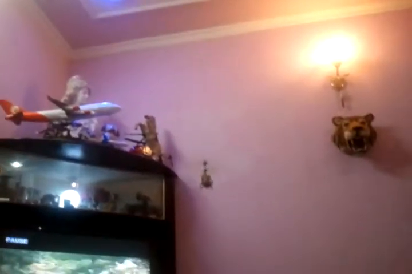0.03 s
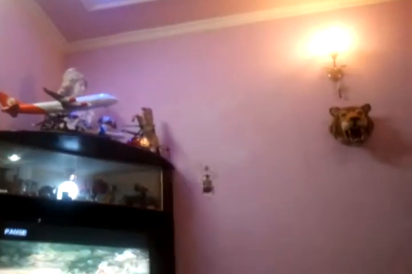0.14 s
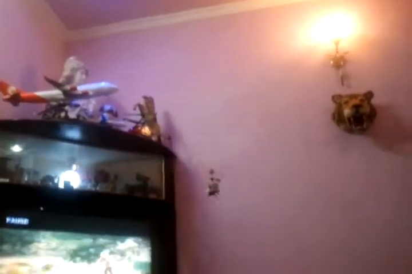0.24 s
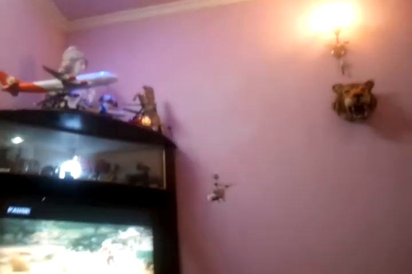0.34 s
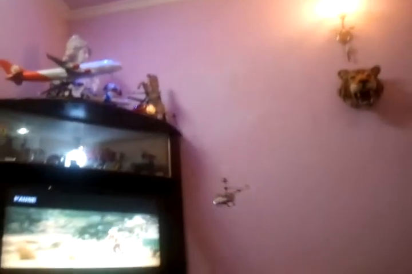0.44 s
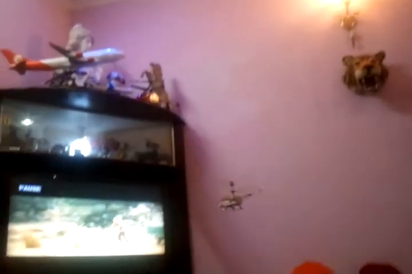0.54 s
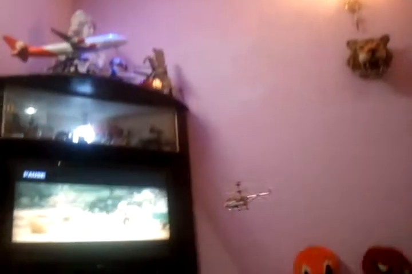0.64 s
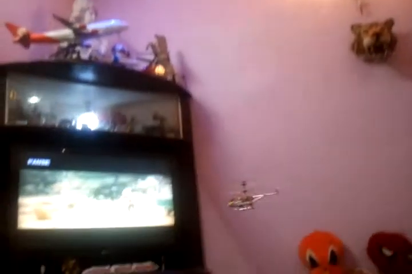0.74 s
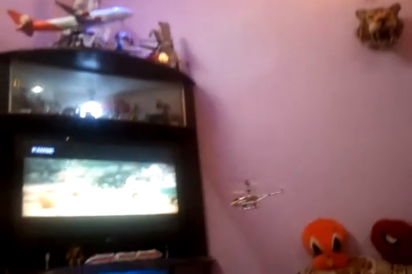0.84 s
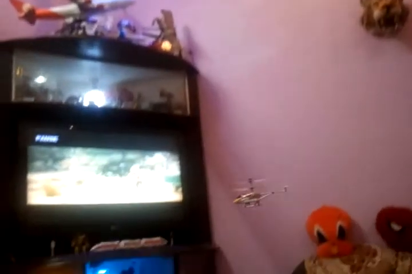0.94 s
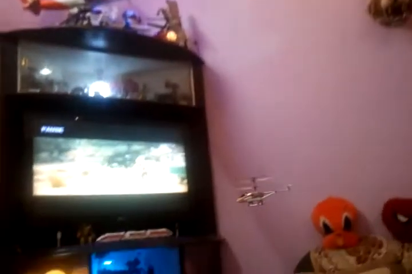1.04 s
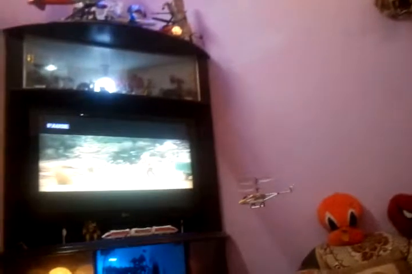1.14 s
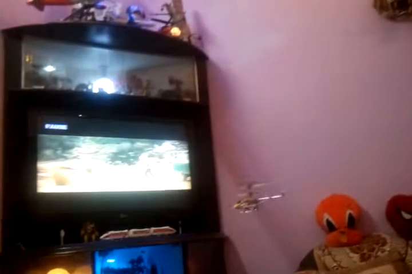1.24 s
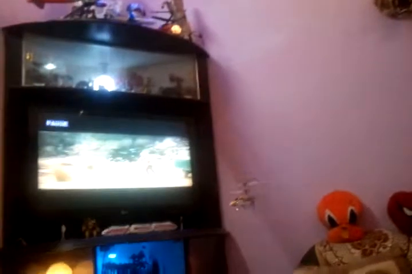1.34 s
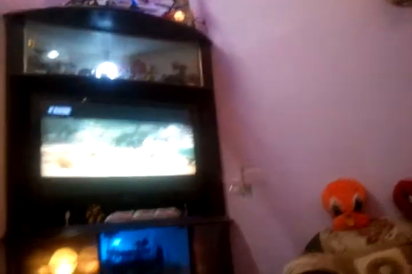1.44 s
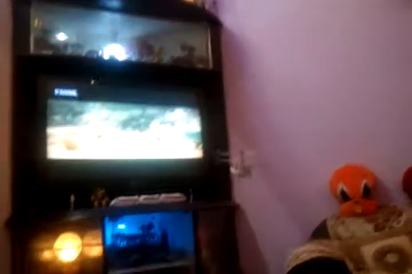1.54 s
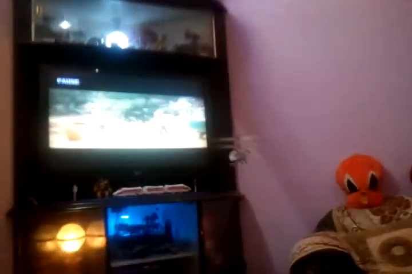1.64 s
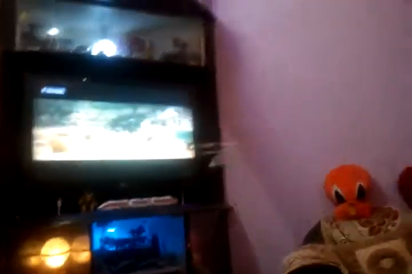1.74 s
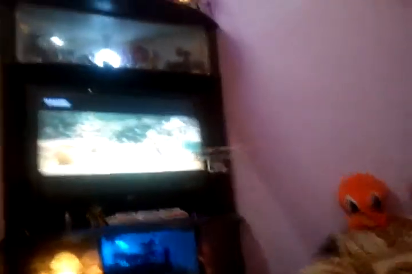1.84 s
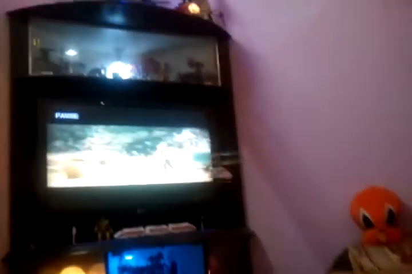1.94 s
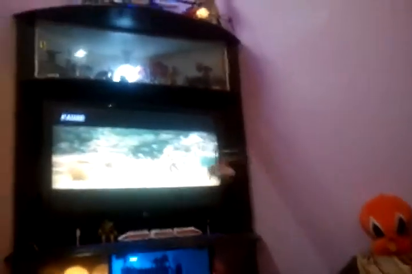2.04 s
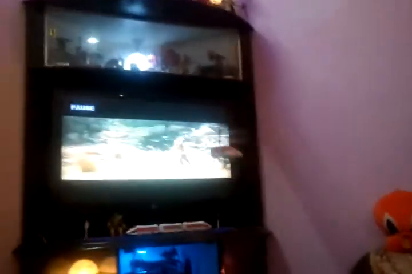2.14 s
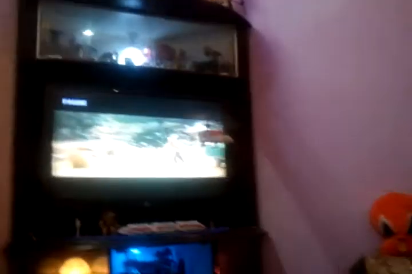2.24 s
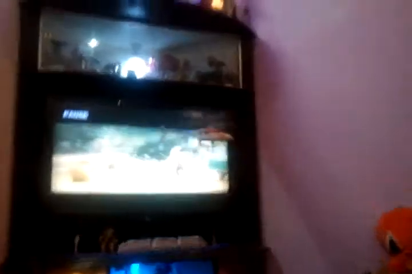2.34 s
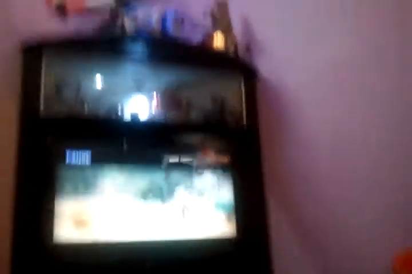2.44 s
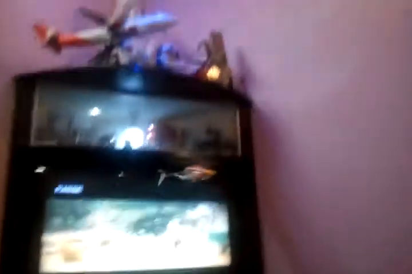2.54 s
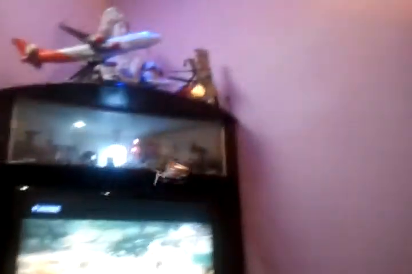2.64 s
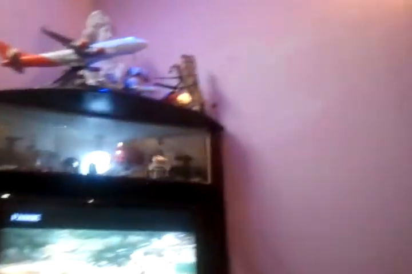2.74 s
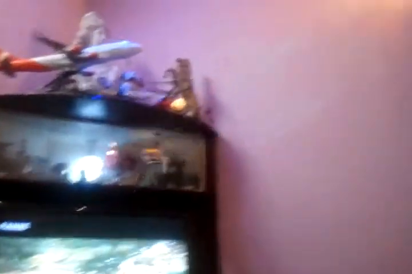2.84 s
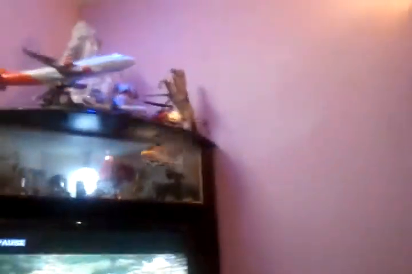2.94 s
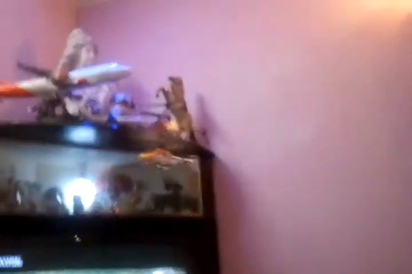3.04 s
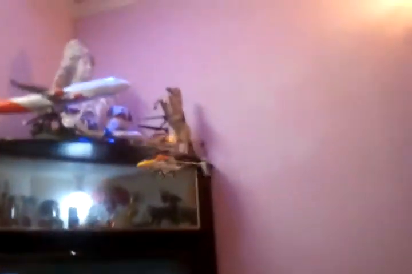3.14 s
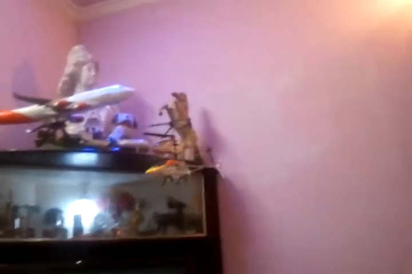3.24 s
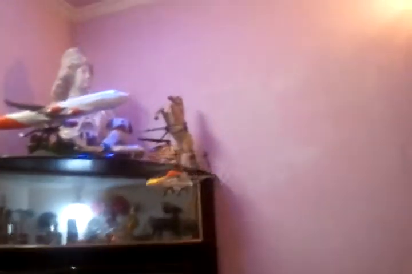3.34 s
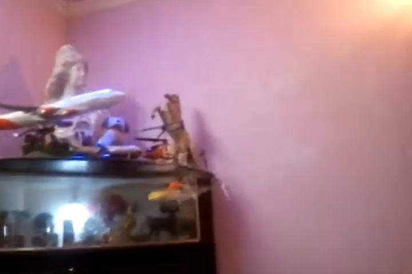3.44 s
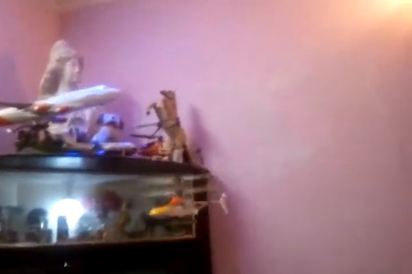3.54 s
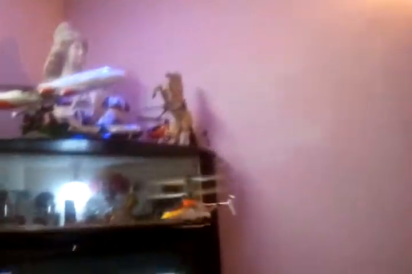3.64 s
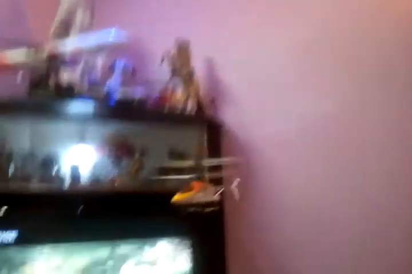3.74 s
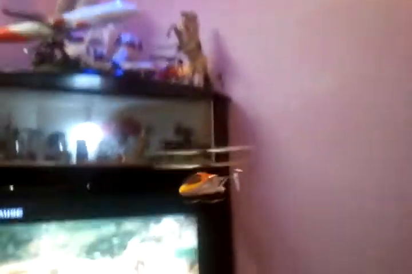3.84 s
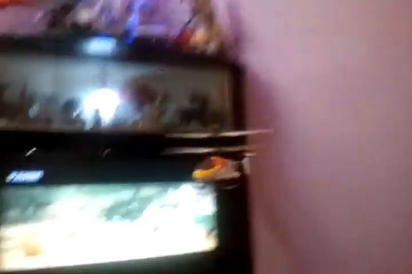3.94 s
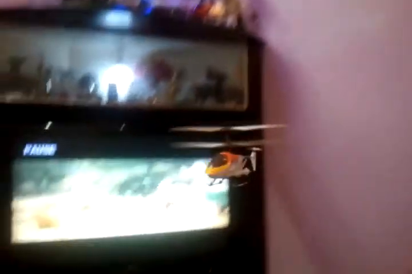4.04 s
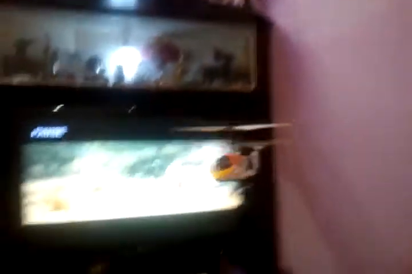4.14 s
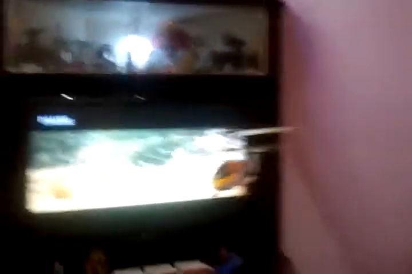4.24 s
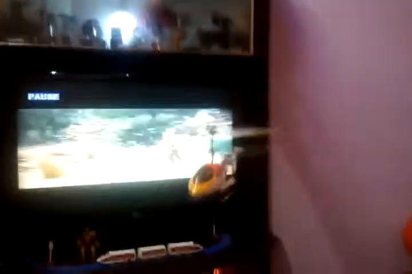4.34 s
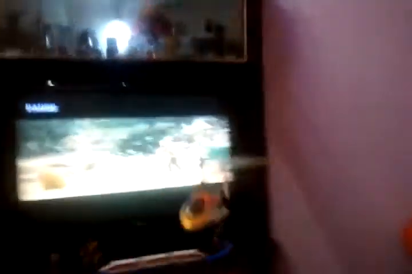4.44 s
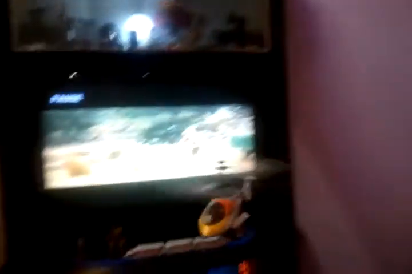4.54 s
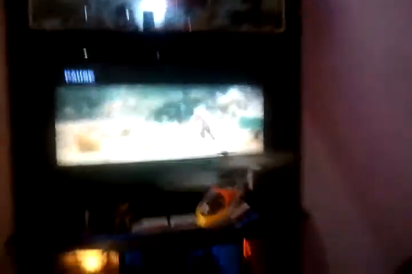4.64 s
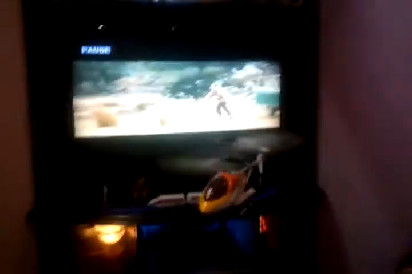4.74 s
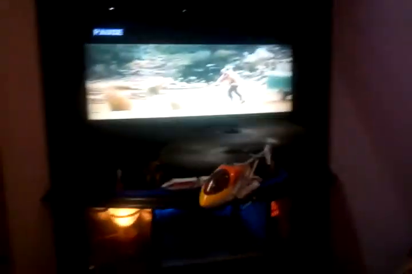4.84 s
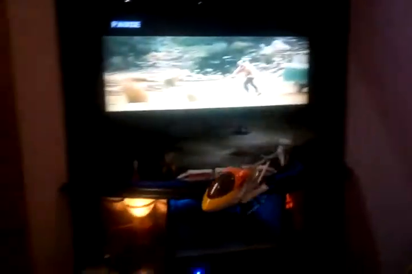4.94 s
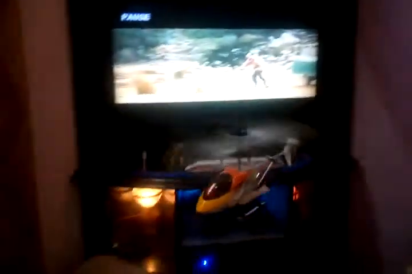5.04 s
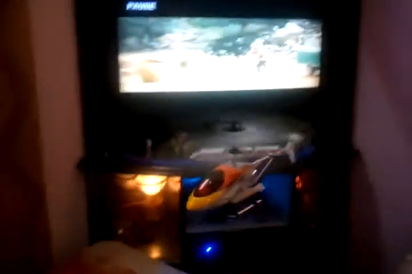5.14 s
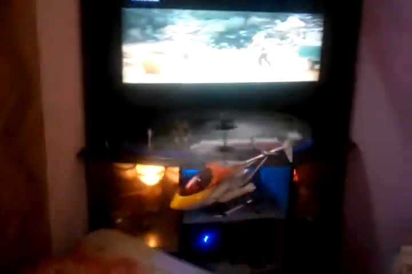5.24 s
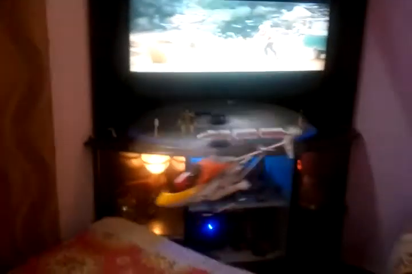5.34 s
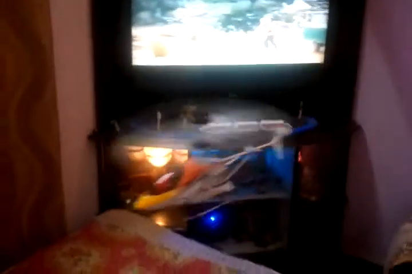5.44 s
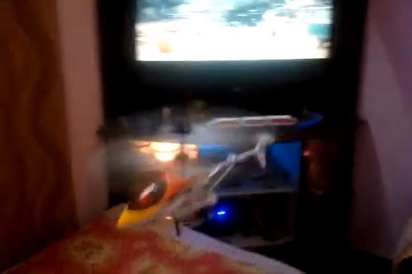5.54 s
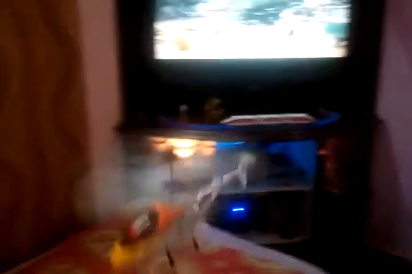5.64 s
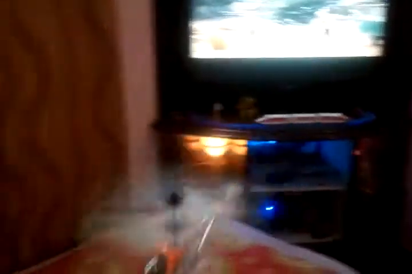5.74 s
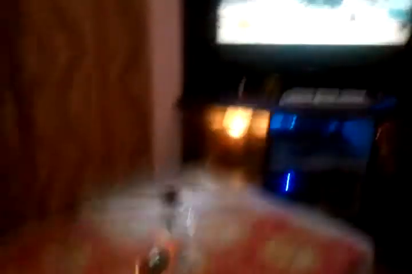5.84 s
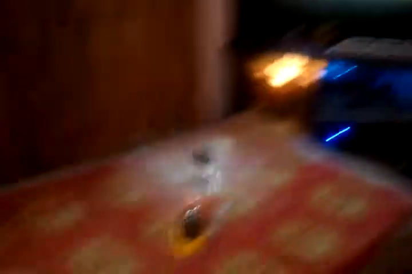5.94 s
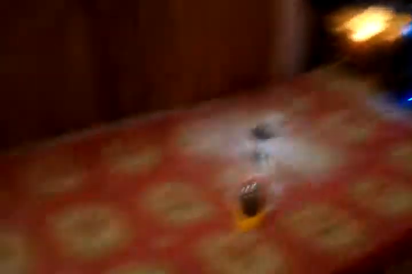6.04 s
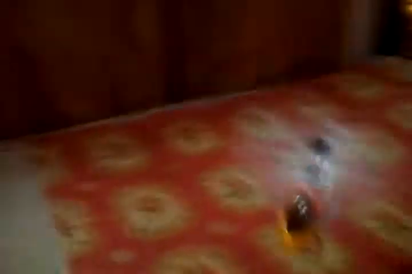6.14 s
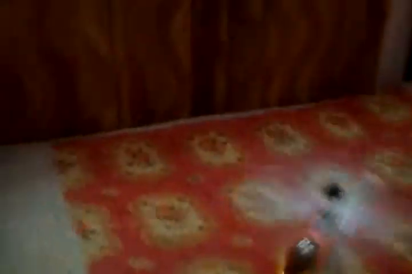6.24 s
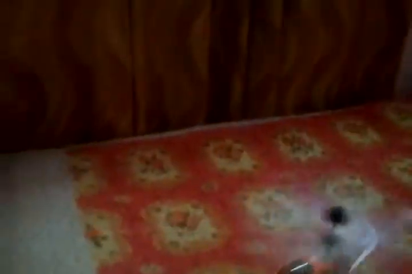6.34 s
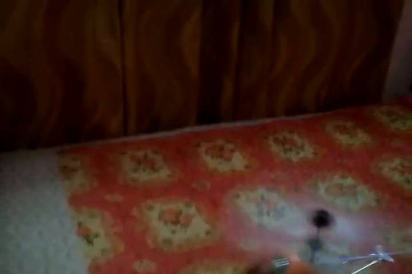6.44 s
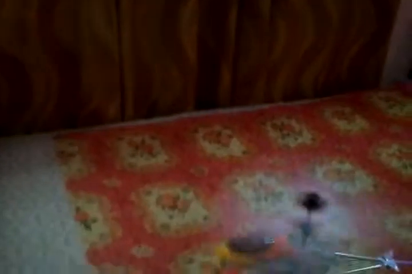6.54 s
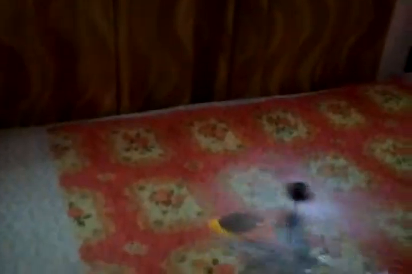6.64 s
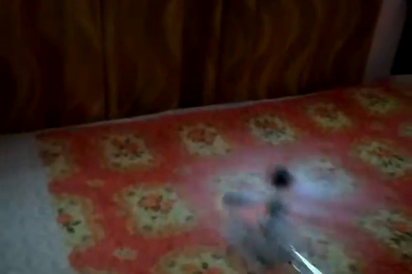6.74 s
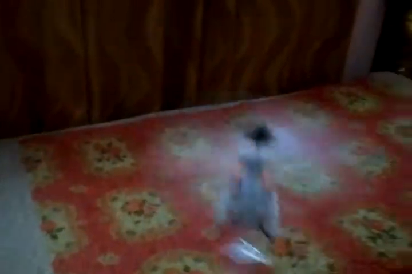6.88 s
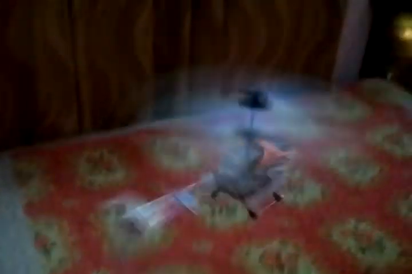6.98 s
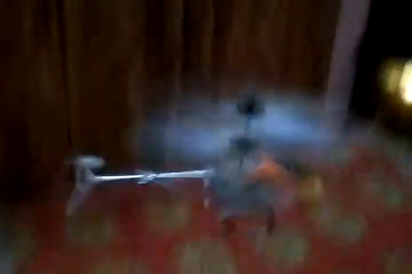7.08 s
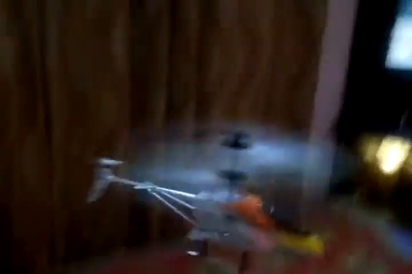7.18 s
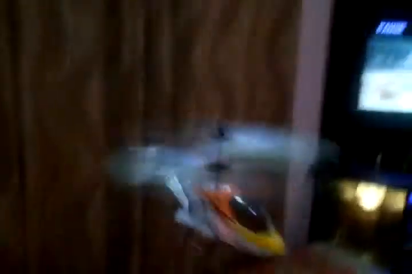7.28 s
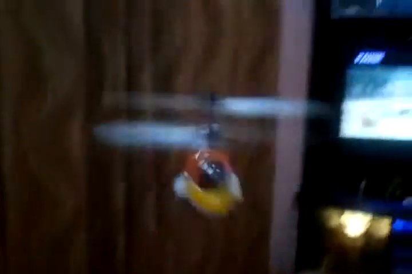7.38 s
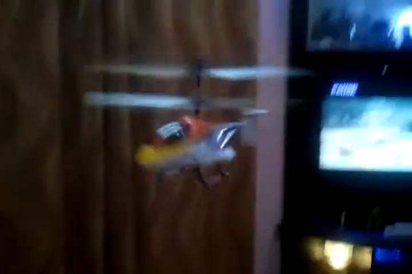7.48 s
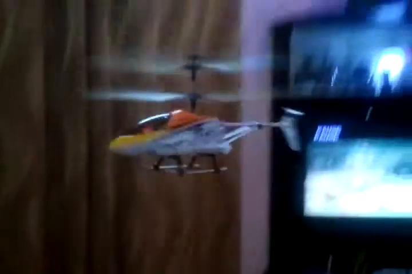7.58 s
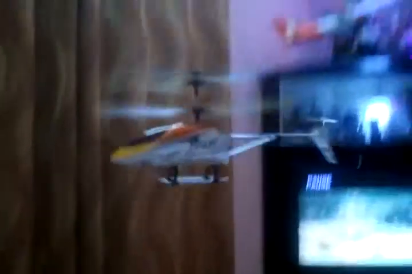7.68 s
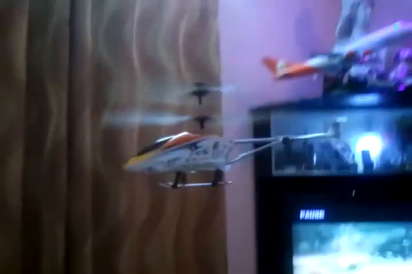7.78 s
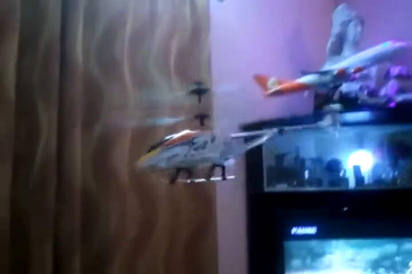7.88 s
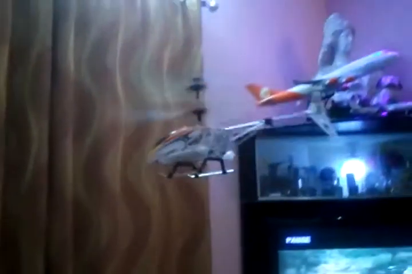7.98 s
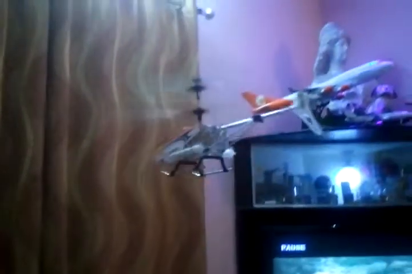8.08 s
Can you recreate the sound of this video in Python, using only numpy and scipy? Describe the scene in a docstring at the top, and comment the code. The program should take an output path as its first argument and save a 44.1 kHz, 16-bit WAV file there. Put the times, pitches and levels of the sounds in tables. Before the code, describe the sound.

In a furnished living room, a small toy helicopter flies with a continuous shrill whine from two geared motors whose pitches drift apart and together. Rotor air rushes and gears hiss. The pitch dips midway, a few soft knocks follow, then it dips again and surges louder near the handheld microphone, ending with a low lumpy rustle.

```python
"""Toy helicopter in a living room

A toy helicopter with two counter-turning rotors flies about, nearer and farther. Each rotor has its own
geared motor, so two combs of shaft orders glide apart and together, with gear hiss and clatter.
The blades sound tones where they cross and push a rush of air. Under it lie three faint steady low tones;
later come a few soft knocks and a lumpy low rustle. Sampling at 16 kHz leaves a weak mirrored treble.
"""
import sys
import numpy as np
from scipy import signal
from scipy.fft import rfft, irfft, next_fast_len
from scipy.io import wavfile
from scipy.ndimage import uniform_filter1d, map_coordinates

SR = 44100
rng = np.random.default_rng(int(sys.argv[2]) if len(sys.argv) > 2 else 0)


def dump(signal):
    """Clip the signal to [-1, 1] and save it as 16-bit WAV at the path in sys.argv[1]."""
    limited = np.clip(np.atleast_2d(signal).T, -1, 1)
    pcm = np.round(limited * 32767).astype(np.int16)
    wavfile.write(sys.argv[1], SR, pcm)


N = 357651

# Speed of the two motors: t/s, fast motor/(turns/s), slow motor/(turns/s)
MOTOR_SPEEDS = [(0, 256.5, 234.6), (0.37, 257.3, 234), (0.67, 262.1, 241.8), (0.85, 270.1, 252.3),
                (0.94, 272.2, 256.1), (1.16, 274.2, 259.9), (1.64, 274.8, 262.5), (2.02, 275, 263.9),
                (2.31, 277.8, 261.4), (2.56, 274.2, 264.9), (2.9, 274.1, 265.7), (3.0, 268.6, 258.9),
                (3.14, 262.9, 253), (3.42, 236.3, 219.7), (3.47, 233.8, 213.2), (3.52, 236.9, 210.4),
                (3.7, 249.1, 219.1), (3.84, 259.4, 229.3), (4.09, 264.3, 244.2), (4.21, 266, 248.6),
                (4.4, 266.7, 253.3), (4.92, 268.1, 253.5), (5.25, 268.2, 252.1), (5.495, 266.2, 248.5),
                (5.61, 250.8, 231.4), (5.78, 241.5, 213.7), (5.95, 248.5, 216.2), (6.08, 265.6, 238.6),
                (6.25, 274.9, 262.3), (6.39, 276.8, 271.1), (6.5, 277.3, 274.5), (6.62, 276.4, 276.3),
                (7.245, 279.6, 279.8), (7.36, 273.6, 272.4), (7.55, 269.8, 262), (7.69, 257.2, 247.8),
                (7.77, 254.5, 241.9), (7.89, 252.4, 236.8), (8.11, 251.8, 232.4)]
# Blade-crossing tones, strongest when the rotor disc faces the microphone:
# t/s, crossing tone level/dB, its 2nd harmonic level/dB, its 3rd harmonic level/dB
BLADE_THUMP = [(0, -67.5, -50.5, -48.5), (.58, -55, -50.5, -52), (1.0, -56.5, -57, -64),
               (1.9, -59, -55.5, -56), (2.6, -57, -49, -58.5), (3.0, -53.5, -57.5, -53.5),
               (3.44, -70, -59.5, -58), (4.0, -54, -63, -51), (4.5, -53.5, -51.5, -69.5),
               (5.4, -56.5, -57, -62), (5.6, -51, -61, -54), (5.75, -58.5, -61, -74.5),
               (6.12, -46.5, -52, -50.5), (6.56, -41, -36.5, -39), (6.93, -41, -50.5, -58),
               (7.23, -46, -41.5, -43), (7.4, -54.5, -53, -56), (7.52, -53.5, -57, -39.5),
               (7.66, -50, -45, -64), (7.82, -55.5, -54, -41.5), (8.11, -51.5, -53, -55)]
# Nearness: t/s, rotor rush level before trim/dB, gear hiss level before trim/dB, gain on the whines/dB
NEARNESS = [(0, -41.5, -31, -0.5), (.38, -40, -32, -5.5), (.92, -40.5, -27, -1), (1.5, -40.5, -28.5, -3.5),
            (1.94, -40, -30, -3), (2.3, -39.5, -24, -2.5), (2.75, -39, -28.5, -2.5), (3.2, -39.5, -27, -4),
            (3.7, -41, -26, -0.5), (4.3, -37, -31, 3), (4.86, -36, -28.5, 1.5), (5.17, -35.5, -29.5, 4),
            (5.44, -35, -30.5, 2), (5.95, -38, -26, 2), (6.3, -33.5, -37.5, 1.5), (6.62, -34.5, -21, 4.5),
            (6.91, -34.5, -27.5, 2), (7.25, -36, -20, 1.5), (7.57, -34.5, -27.5, 1.5),
            (7.9, -36.5, -18.5, 5.5), (8.11, -37.5, -25, 3.5)]
GEAR_RATIO = 6  # motor turns per rotor turn
CONTROL_STEP = 64  # samples between points of a slow curve


def amp(db):
    """Gain of a level in dB."""
    return 10 ** (np.asarray(db) / 20)


def unit(x):
    """Scale x to rms 1."""
    return x / np.sqrt(np.mean(x ** 2) + 1e-20)


def about_mean(curve):
    """A curve's swing about its own mean."""
    return curve - curve.mean()


def curves(rows):
    """One value per sample for each column after the time."""
    times, *columns = np.transpose(rows)
    return [np.interp(np.arange(N) / SR, times, column) for column in columns]


def wobble(rate_hz):
    """A smooth random curve with rate_hz knots a second."""
    knots = rng.standard_normal(int(N * rate_hz / SR) + 4)
    coarse_at = np.arange(0, N + CONTROL_STEP, CONTROL_STEP)
    coarse = map_coordinates(knots, [coarse_at * rate_hz / SR])
    return np.interp(np.arange(N), coarse_at, coarse)


def coloured(points, hz):
    """Gain at hz from (f/Hz, level/dB) points on a log frequency axis, -120 dB outside them."""
    f, db = np.transpose(points)
    return amp(np.interp(np.log(hz + 1), np.log(f), db, -120, -120))


def filtered(x, response):
    """Multiply the spectrum of x by a response of frequency."""
    size = next_fast_len(N + SR // 2)
    return irfft(rfft(x, size) * response(np.fft.rfftfreq(size, 1 / SR)), size)[:N]


def noise(spectrum, patchy_db):
    """Coloured noise of rms 1, with time-frequency patches whose gain varies by patchy_db rms."""
    bins = signal.stft(rng.standard_normal(N), nperseg=512)[2]
    field = uniform_filter1d(rng.standard_normal(bins.shape), 5, 0)  # smooth over frequency
    field = uniform_filter1d(field, 12, 1)  # smooth over time
    patchy = signal.istft(bins * amp(patchy_db * unit(field)), nperseg=512)[1][:N]
    return unit(filtered(patchy, lambda hz: coloured(spectrum, hz)))


def tone(speed, order, level_db, wet, drift):
    """One shaft order: a direct part plus a room part whose size and phase wander, faster while it glides."""
    mode_gap_hz = 22.075  # a gliding tone meets a new room mode about this often
    step = slice(None, None, CONTROL_STEP)
    glide = np.abs(np.gradient(order * speed[step])) / mode_gap_hz
    modes = np.cumsum(glide + drift * CONTROL_STEP / SR)
    re, im = (map_coordinates(rng.standard_normal(4000), [modes + 1]) for _ in range(2))
    share = np.sqrt(np.clip(wet, 0, 1) / 2)
    path = np.sqrt(1 - 2 * share ** 2) + share * (re + 1j * im)
    path = np.interp(np.arange(N), np.arange(N)[step], path)
    angle = 2 * np.pi * order * np.cumsum(speed) / SR + rng.uniform(0, 2 * np.pi)
    return np.sqrt(2) * amp(level_db) * (path.real * np.cos(angle) - path.imag * np.sin(angle))


def comb(speed, orders, near_db, wet, drift):
    """Many orders of one shaft that share one level swing."""
    return amp(near_db) * sum(tone(speed, round(k), db, wet, drift) for k, db in orders)


def rotor_angle(speed):
    """Angle of the big gear and its rotor, in turns."""
    return np.cumsum(speed) / GEAR_RATIO / SR


def throb(shaft, depth):
    """Gain that swings once a rotor turn with the load."""
    return 1 + depth * np.sin(2 * np.pi * rotor_angle(shaft))


def weak_orders(fast, slow):
    """The weaker shaft orders of both motors, following the distance and coloured by the frame."""
    # Weaker orders at mean distance, ahead of the frame: order, level/dB
    fast_orders = [(1, -65.5), (2, -43), (7, -48), (10, -44), (13, -55), (18, -46.5), (20, -56),
                   (23, -51.5), (24, -55), (25, -53), (27, -34.5), (29, -36.5), (30, -38)]
    slow_orders = [(2, -46.5), (10, -46.5), (15, -45), (17, -44), (18, -39), (20, -52), (22, -49.5),
                   (31, -44.5), (32, -50), (34, -57)]
    # How frame, room and microphone pass these tones: f/Hz, level/dB
    frame = [(200, -16.5), (1300, -11), (1630, 11.5), (2100, -6.5), (2550, -14.5), (3300, 2), (3750, -2.5),
             (4500, -8), (5600, 2), (6000, 6), (7300, -6.5), (7650, -17.5), (7950, -19), (9000, -48.5)]
    rush_db, hiss_db, _ = curves(NEARNESS)
    near_db = about_mean(rush_db) + 0.4 * about_mean(hiss_db)
    weak = comb(fast, fast_orders, near_db, wet=0.59, drift=8)
    weak += comb(slow, slow_orders, near_db, wet=0.7, drift=8)
    return filtered(weak, lambda hz: coloured(frame, hz))


def flutter():
    """Even dips in level (dB) during each spell."""
    # Flutter spells: first peak t/s, last peak t/s, dips between, depth/dB
    spells = [(.72, 1.035, 4, 13), (1.87, 2.185, 3, 12), (3.81, 4.25, 4, 13), (6.11, 6.565, 4, 11)]
    t = np.arange(N) / SR
    level_db = np.zeros(N)
    for first, last, dips, depth_db in spells:
        progress = np.clip((t - first) / (last - first), 0, 1)
        level_db -= depth_db * np.sin(np.pi * dips * progress) ** 2
    return level_db


def lead_tones(fast, slow):
    """Gear mesh at the 14th order of each motor, and the next loudest whines, each on its own level curve."""
    # Fast gear mesh ahead of its flutter, swelling as the toy turns and drifts: t/s, level/dB
    fast_mesh = [(0, -32.5), (.2, -38), (.53, -30.5), (.69, -39), (.72, -24), (.87, -23), (1.04, -22.5),
                 (1.13, -48.5), (1.33, -25), (1.47, -34.5), (1.57, -25.5), (1.79, -41.5), (1.87, -30),
                 (2.08, -23), (2.19, -25.5), (2.42, -25.5), (2.51, -33.5), (2.56, -27.5), (2.72, -24.5),
                 (2.76, -42), (2.83, -29.5), (3.1, -32.5), (3.3, -40.5), (3.58, -31.5), (3.66, -38),
                 (3.91, -27), (4.03, -29), (4.25, -23), (4.44, -37.5), (4.54, -21.5), (4.82, -33),
                 (4.94, -22.5), (5.08, -27.5), (5.13, -25.5), (5.28, -27.5), (5.33, -37), (5.46, -20),
                 (5.53, -35.5), (5.75, -32), (6.05, -36.5), (6.1, -23), (6.35, -19.5), (6.45, -27.5),
                 (6.56, -20.5), (6.65, -23), (6.7, -16), (6.8, -15), (6.85, -24), (7.13, -25), (7.17, -16),
                 (7.2, -39), (7.24, -22), (7.45, -22), (7.5, -26.5), (7.54, -22), (7.62, -36), (7.8, -27),
                 (8.11, -42)]
    # Slow gear mesh: t/s, level/dB
    slow_mesh = [(0, -40), (.13, -38.5), (.4, -39), (1.0, -39.5), (1.76, -43.5), (1.9, -32), (2.02, -35),
                 (2.4, -43), (2.56, -31.5), (2.75, -45), (2.86, -31.5), (3.15, -47), (4.3, -40.5),
                 (4.98, -35.5), (5.17, -38), (5.4, -32.5), (5.62, -50.5), (6.2, -34), (6.56, -28.5),
                 (6.68, -39), (6.93, -42.5), (7.25, -38), (7.37, -26.5), (7.55, -36), (8.11, -37)]
    # Next loudest whines: t/s, slow 28th order level/dB, fast 6th level/dB, fast 8th level/dB
    leads = [(0, -37, -52, -34), (.25, -48.5, -50, -44), (.55, -45.5, -54, -42), (.75, -40, -61.5, -55),
             (1.05, -30, -44, -52), (1.25, -25, -42.5, -51), (1.55, -34.5, -46, -55),
             (1.95, -43, -41.5, -62), (2.15, -28, -49, -44), (2.32, -26, -31, -50), (2.62, -35.5, -53, -56),
             (2.8, -38.5, -48, -54), (3.1, -35, -65, -46.5), (3.4, -38, -52, -37.5),
             (3.75, -38, -42.5, -45.5), (4.1, -43, -52, -46.5), (4.45, -30, -46, -48),
             (4.75, -41, -38, -49), (4.9, -29.5, -46, -54), (5.2, -31.5, -39.5, -58),
             (5.45, -39.5, -45, -46), (5.65, -32, -48, -31.5), (5.9, -40, -42.5, -47), (6.1, -54, -46, -55),
             (6.3, -25.5, -38.5, -51), (6.52, -50, -38, -35), (6.72, -41.5, -28, -47.5),
             (6.9, -43.5, -44.5, -37), (7.24, -46.5, -21.5, -44), (7.58, -32.5, -58, -43),
             (7.85, -33.5, -39, -31), (8.11, -39.5, -46, -34.5)]
    fast_db = curves(fast_mesh)[0] + flutter()
    out = throb(fast, 0.042) * tone(fast, 14, fast_db, wet=0.04, drift=20)
    for shaft, order, level_db in zip([slow, fast, fast], [28, 6, 8], curves(leads)):
        out += throb(shaft, 0.28) * tone(shaft, order, level_db, wet=0.44, drift=9)
    out += throb(slow, 0.17) * tone(slow, 14, curves(slow_mesh)[0], wet=0.33, drift=10)
    return out


def body_whines(fast, slow):
    """Stronger whines that light up body resonances as they glide through them."""
    # Whines ahead of distance and body: order, level/dB, swing once a rotor turn (0-1)
    fast_whines = [(4, -53.5, .17), (12, -46.5, .17), (15, -55, 0), (16, -42.5, .17), (22, -50, .3),
                   (26, -48, .17), (28, -46, 0.1)]
    slow_whines = [(4, -53.5, .17), (6, -48, 0.26), (8, -49, .2), (12, -45.5, 0.14), (16, -46, 0.2),
                   (24, -51, .3), (25, -53.5, .17), (26, -46.5, 0.15), (27, -56.5, .17), (29, -49, .17),
                   (30, -58, .17)]
    # Body resonances: f/Hz, level/dB
    body = [(850, -6.5), (1100, 1), (1300, -10.5), (1520, 5.5), (1670, 9), (1800, 1.5), (2250, -4),
            (2600, -5), (3300, 1), (3600, -0.5), (3800, 3), (4100, 8.5), (4450, -3.5), (5200, 2.5),
            (5700, -2), (6100, 8.5), (6600, 2), (7250, 7.5), (7600, 5.5), (7900, -14.5), (8500, -22.5)]
    # Extra gain on the high whines: t/s, level/dB
    treble = [(0, 1), (.7, 3.5), (1.4, 1.5), (2.0, -1), (2.3, 3.5), (3.0, 5), (3.5, 3), (4.1, 2), (4.9, 1),
              (5.5, 1.5), (5.9, 4), (6.25, -2), (6.65, 5.5), (7.0, 3), (7.3, 5.5), (7.55, 2), (7.85, 7.5),
              (8.11, 2)]
    # Whines that grow when the rotor disc faces the microphone: order
    facing_orders = (22, 24, 26)
    treble_from_hz = 5200  # judged by a whine's mean pitch
    whine_db = curves(NEARNESS)[2]
    treble_db, = curves(treble)
    facing_db = 0.42 * about_mean(curves(BLADE_THUMP)[0])
    out = np.zeros(N)
    for shaft, whines in [(fast, fast_whines), (slow, slow_whines)]:
        for order, db, depth in whines:
            order = round(order)
            level_db = db + whine_db
            level_db = level_db + treble_db * (order * shaft.mean() > treble_from_hz)
            level_db = level_db + facing_db * (order in facing_orders)
            whine = tone(shaft, order, level_db, wet=0.7, drift=10)
            out += coloured(body, order * shaft) * throb(shaft, depth) * whine
    return out


def clatter(speed):
    """The uneven teeth of the big gear rattle the same way on every turn; the pattern slowly changes."""
    # Clatter colour: f/Hz, relative level/(dB per Hz)
    colour = [(900, -34.5), (1400, -12), (1650, 2.5), (2250, -2.5), (2700, -19), (3800, -7.5),
              (5000, -14.5), (6500, -6.5), (7500, 4), (7950, -27)]
    teeth = rng.standard_normal((3, 400))  # three patterns of 400 points round the gear
    spot = rotor_angle(speed) % 1 * teeth.shape[1]
    rattle = sum(wobble(5) * map_coordinates(row, [spot], mode="grid-wrap") for row in teeth)
    return unit(filtered(rattle, lambda hz: coloured(colour, hz)))


def room(x, t60):
    """The answer of a furnished room, which smears gliding tones."""
    t = np.arange(SR // 2) / SR
    tail = rng.standard_normal(len(t)) * amp(-60 * t / t60) * (t > 0.008)
    return signal.fftconvolve(x, tail / np.linalg.norm(tail))[:N]


def motors():
    """Two geared motors: shaft orders, gear mesh, whines and clatter, with their room answer."""
    fast, slow = curves(MOTOR_SPEEDS)
    rush_db = curves(NEARNESS)[0]
    out = weak_orders(fast, slow) + lead_tones(fast, slow) + body_whines(fast, slow)
    out += amp(rush_db - 2.5) * (clatter(fast) + clatter(slow))
    return out + amp(-13.5) * room(out, t60=0.35)


def blade_tones(half_crossing):
    """Two-bladed rotors turning against each other sound tones where the blades cross."""
    # Weaker tones ahead of the thump's swing: multiple of half the crossing rate, level/dB
    blade_orders = [(3, -65), (8, -54.5), (10, -57), (12, -57)]
    thump = curves(BLADE_THUMP)
    swing_db = about_mean(thump[0])
    tones = comb(half_crossing, blade_orders, 0.23 * swing_db, wet=0.5, drift=4)
    for harmonic, level_db in enumerate(thump, start=1):
        tones += tone(half_crossing, 2 * harmonic, level_db, wet=0.18, drift=5)
    unbalance_db = -65 + 0.6 * swing_db  # the tone at half the crossing rate
    return tones + tone(half_crossing, 1, unbalance_db, wet=0.7, drift=5)


def rotor_air(half_crossing):
    """Turbulent air: a rush that pulses once a blade crossing, over a steadier low wash."""
    # Colours of the rush and the low wash: f/Hz, relative level/(dB per Hz)
    rush_colour = [(900, -40.5), (1250, -16.5), (1650, -1), (2000, -9.5), (2500, -12.5), (3400, -7.5),
                   (3850, 1.5), (4400, -6.5), (5000, -4.5), (5600, -7), (7000, -9), (8000, -32)]
    wash_colour = [(25, -55), (55, -25.5), (90, -4.5), (170, -1), (400, -3.5), (650, -1.5), (1150, 0),
                   (1600, -8)]
    rush_db = curves(NEARNESS)[0]
    beat = 1 + 0.067 * np.sin(4 * np.pi * np.cumsum(half_crossing) / SR)
    rush = amp(rush_db + 5.0) * beat * noise(rush_colour, patchy_db=2.0)
    wash_db = -46 + 0.88 * about_mean(rush_db)
    return rush + amp(wash_db) * noise(wash_colour, patchy_db=0.97)


def gear_hiss(slow):
    """Gear noise that swings once a motor turn and sinks in pitch when the slow motor slows down."""
    # Hiss colours at high and low motor speed: f/Hz, relative level/(dB per Hz)
    high_speed = [(5000, -31.5), (5700, -3), (6100, 1.5), (7250, 4), (7600, -3.5), (7950, -17.5)]
    low_speed = [(4800, -24.5), (5600, -7), (6100, 2), (6800, -6.5), (7400, -6.5), (7950, -26)]
    hiss_db = curves(NEARNESS)[1]
    teeth = 1 + 0.1 * np.sin(2 * np.pi * np.cumsum(slow) / SR)  # the gear runs slightly off centre
    bright = np.clip((slow - 225) / 30, 0, 1)  # crossfade from 225 to 255 turns/s
    hiss = np.sqrt(bright) * noise(high_speed, patchy_db=3.5)
    hiss += np.sqrt(1 - bright) * noise(low_speed, patchy_db=2.0)
    return amp(hiss_db - 5.0) * teeth * hiss


def rotors():
    """Blade-crossing tones, moving air and gear hiss, all driven by the motor speeds."""
    fast, slow = curves(MOTOR_SPEEDS)
    half_crossing = (fast + slow) / GEAR_RATIO  # half the blade-crossing rate, Hz
    return blade_tones(half_crossing) + rotor_air(half_crossing) + gear_hiss(slow)


def low_tones():
    """Faint low tones at 50, 150 and 250 Hz, steady in pitch, whose levels waver."""
    # Tone levels ahead of the random wobble on 50 Hz: t/s, 50 Hz level/dB, 250 Hz level/dB
    tone_levels = [(0, -65, -49.5), (1.8, -64, -59.5), (2.5, -66.5, -72), (3.5, -68, -49.5),
                   (4.05, -96, -52.5), (5.2, -81, -62.5), (5.85, -69, -51), (6.75, -67.5, -54),
                   (8.11, -70, -49.5)]
    t = np.arange(N) / SR
    first_db, fifth_db = curves(tone_levels)
    levels = [first_db + 3 * wobble(6), -68 + 5 * wobble(3.4), fifth_db]
    return sum(np.sqrt(2) * amp(db) * np.sin(2 * np.pi * hz * t) for hz, db in zip([50, 150, 250], levels))


def knocks():
    """Soft dull taps: a short decaying click, and a noisy tail around its pitch."""
    # Knocks ahead of the bass cut: t/s, click peak level/dB, f/Hz, tail starting level/dB, tail t60/s
    taps = [(3.8171, -14, 1170, -37.5, 0.24), (4.320, -14, 890, -42.5, .2), (4.333, -19, 743, -39, 0.99)]
    out, t = np.zeros(N), np.arange(SR // 2) / SR
    for start, db, hz, tail_db, t60 in taps:
        click = amp(db - 60 * t / 0.0041) * np.sin(2 * np.pi * hz * t)
        band = signal.butter(2, [0.62 * hz, 1.3 * hz], "band", fs=SR)
        tail = unit(signal.lfilter(*band, rng.standard_normal(len(t))))
        out[round(start * SR):][:len(t)] += click + amp(tail_db - 60 * t / t60) * tail
    return signal.lfilter(*signal.butter(2, 330, "high", fs=SR), out)  # small objects carry no bass


def rustle():
    """A low noise close by, made lumpy by a fast random level."""
    # Rustle ahead of the lumps: t/s, level/dB
    rustle_level = [(7.54, -75), (7.59, -42), (7.67, -43), (7.71, -51), (7.77, -43), (7.86, -43.5),
                    (7.91, -48), (7.97, -43.5), (8.05, -62)]
    # Rustle colour: f/Hz, relative level/(dB per Hz)
    colour = [(200, -25), (290, -3), (420, 0), (520, -2), (600, -11), (760, -5), (870, -9), (980, -25)]
    level_db, = curves(rustle_level)
    lumps_db = 2.5 * wobble(35)
    return amp(level_db + lumps_db) * noise(colour, patchy_db=3)


def scene():
    """Everything at the one microphone."""
    return (motors() + rotors() + low_tones() + knocks() + rustle())[None]


def record(dry):
    """Sampling at 16 kHz keeps under 8 kHz; raising the rate again leaves a weak mirror image above it."""
    rate_hz, top_hz = 16000, 9130
    kept = filtered(dry[0], lambda hz: hz < rate_hz / 2)
    mirrored = 2 * kept * np.cos(2 * np.pi * rate_hz * np.arange(N) / SR)
    edges_hz, edges_db = [8000, 8500, 8800, top_hz], [1, -15.0, -27, -47]

    def leak(hz):
        """Gain of the mirror image, falling above 8 kHz."""
        return amp(np.interp(hz, edges_hz, edges_db)) * (hz > rate_hz / 2)

    return filtered(kept + filtered(mirrored, leak), lambda hz: hz < top_hz)[None]


dry = scene()
out = record(dry)
dump(out)
```